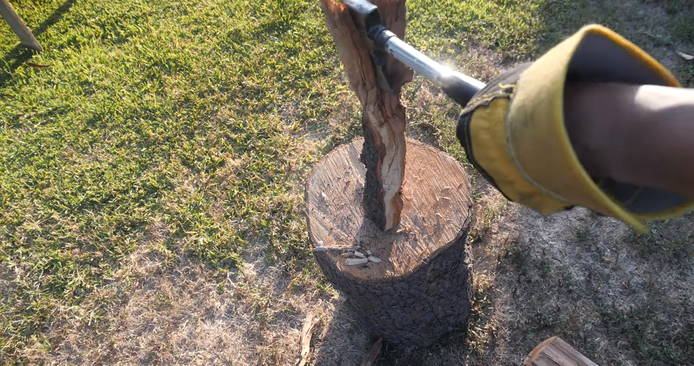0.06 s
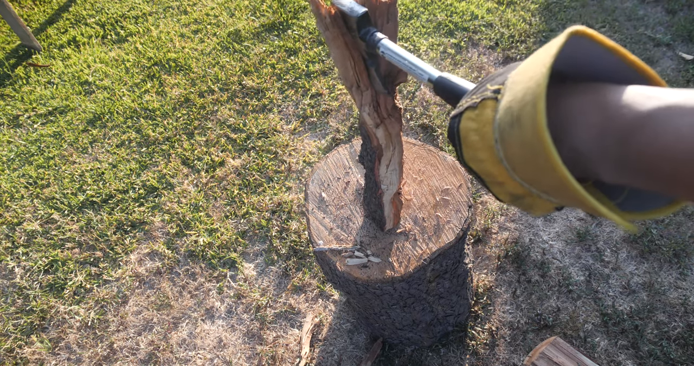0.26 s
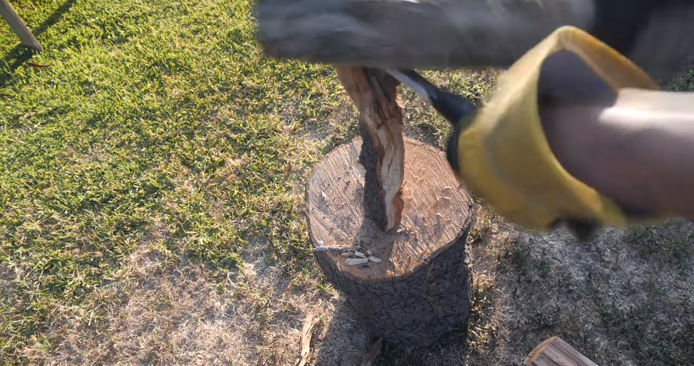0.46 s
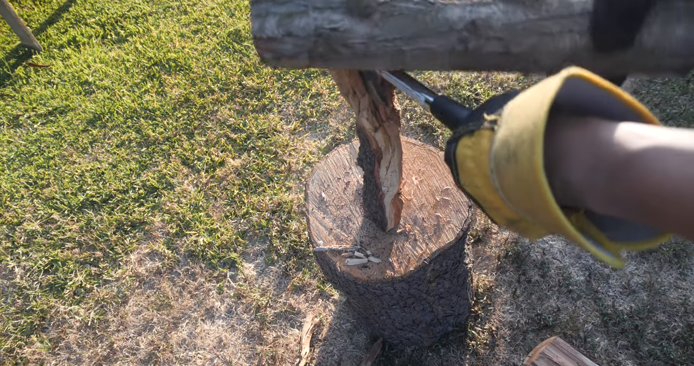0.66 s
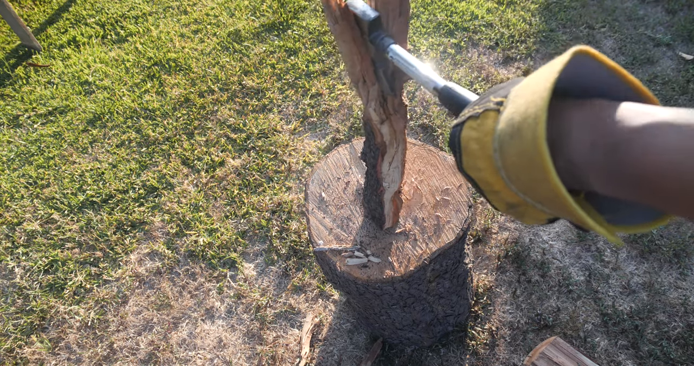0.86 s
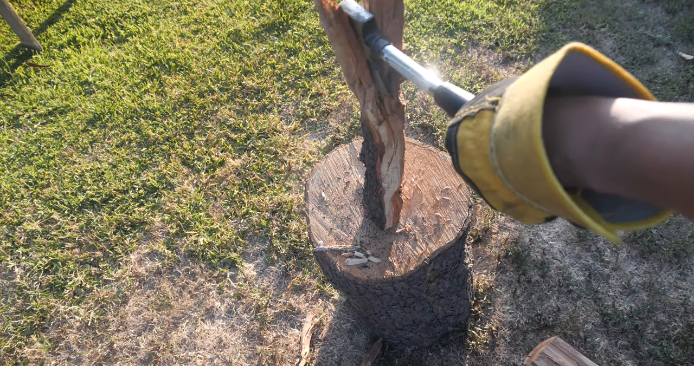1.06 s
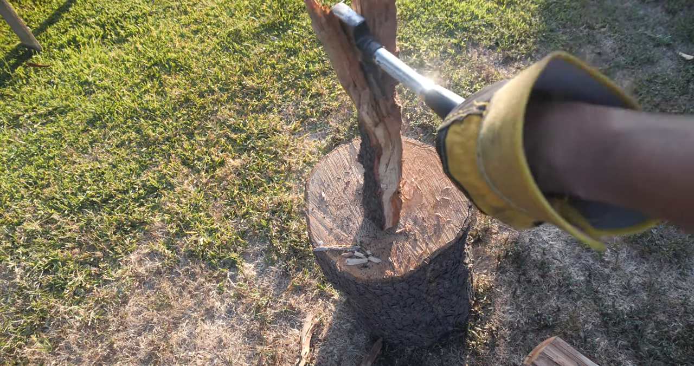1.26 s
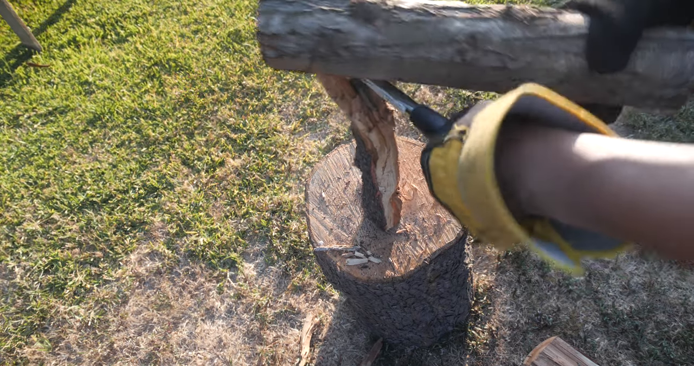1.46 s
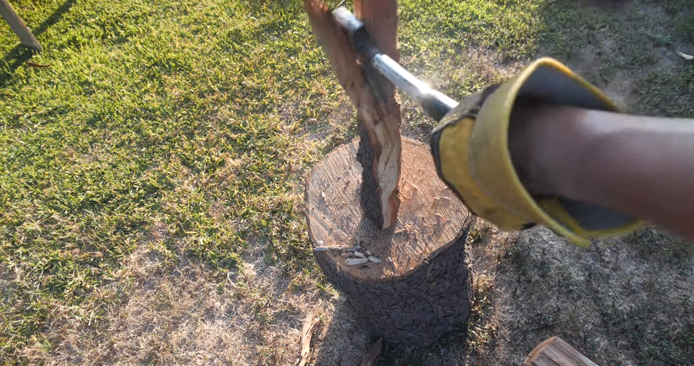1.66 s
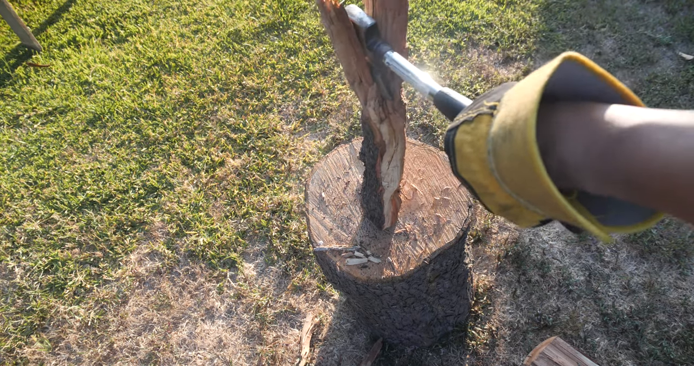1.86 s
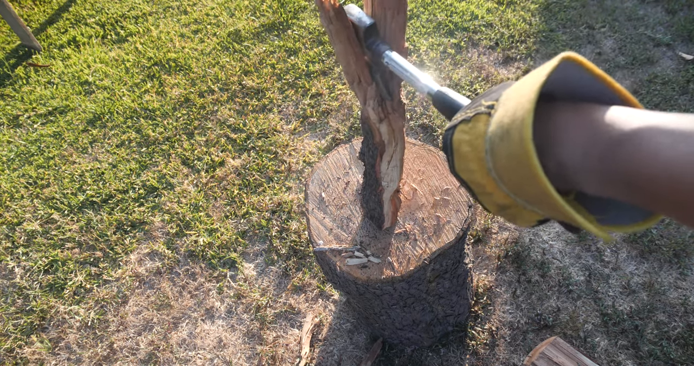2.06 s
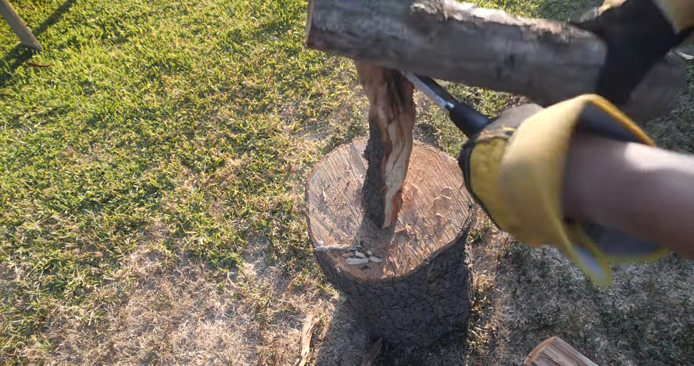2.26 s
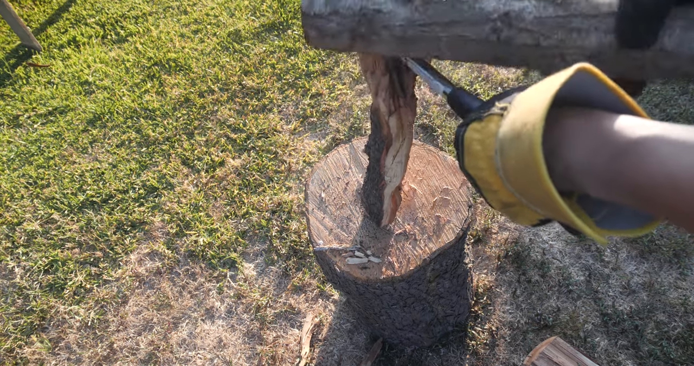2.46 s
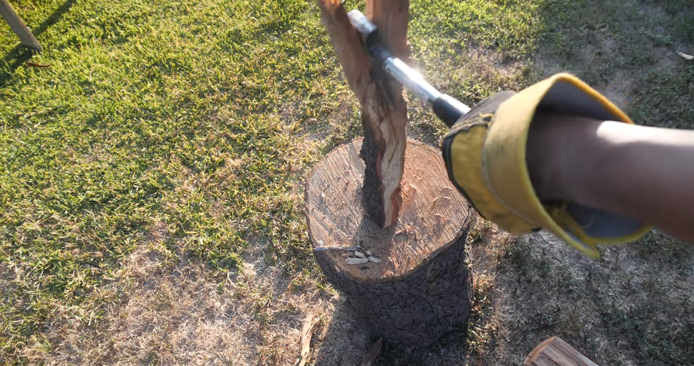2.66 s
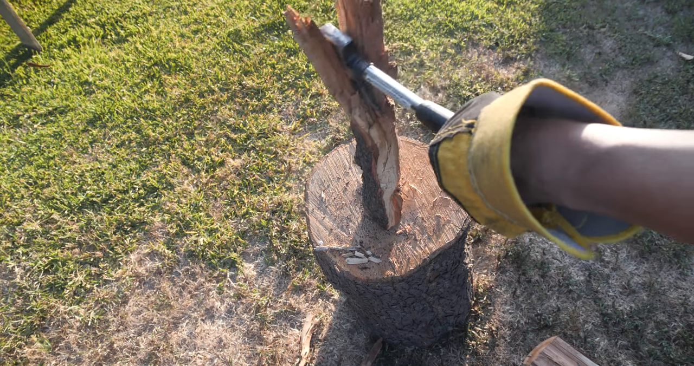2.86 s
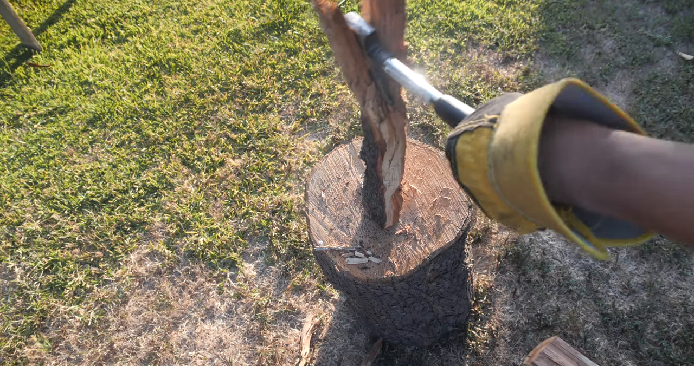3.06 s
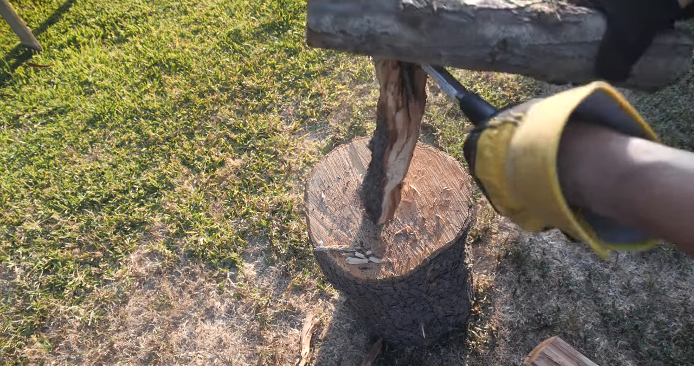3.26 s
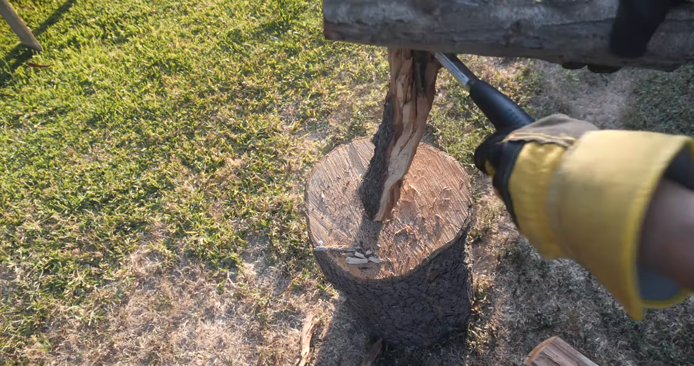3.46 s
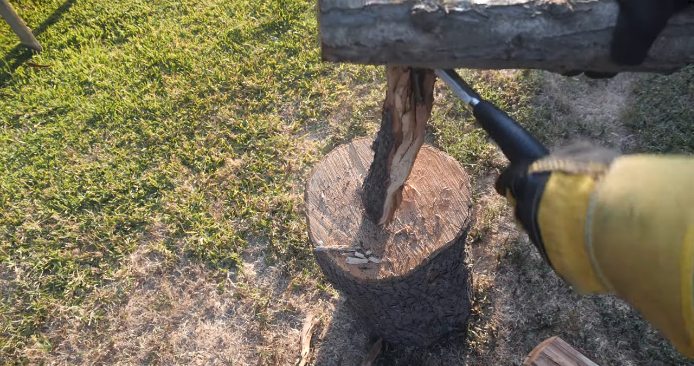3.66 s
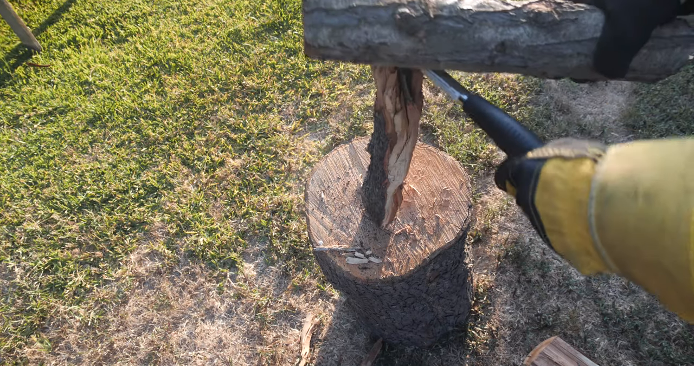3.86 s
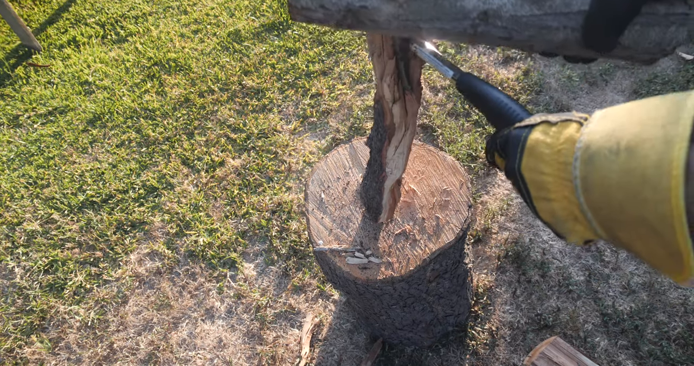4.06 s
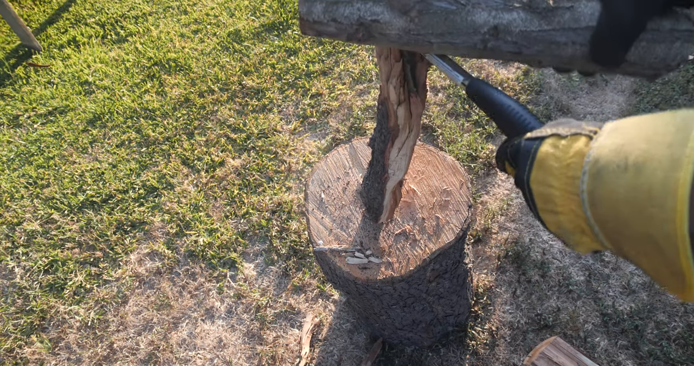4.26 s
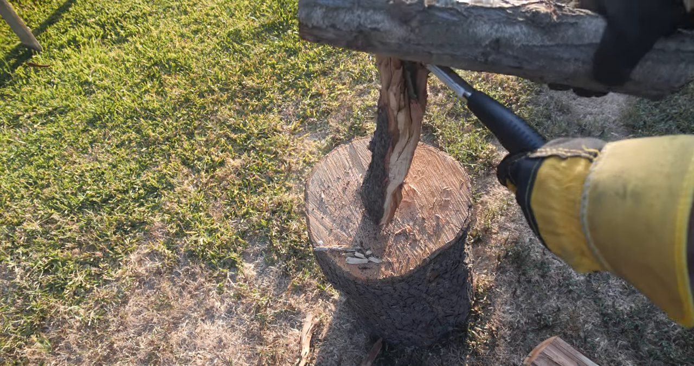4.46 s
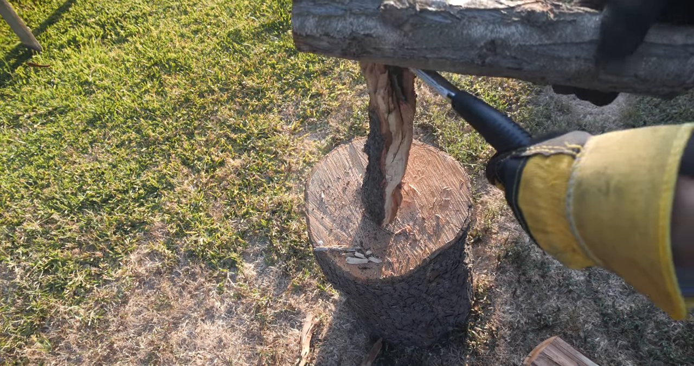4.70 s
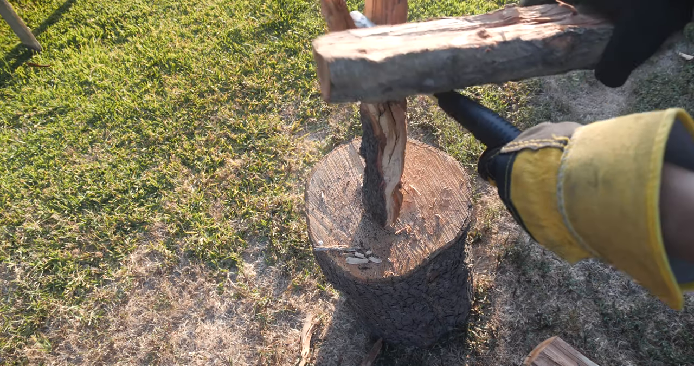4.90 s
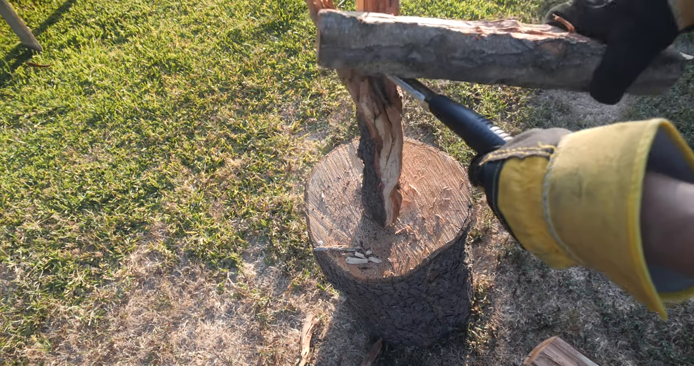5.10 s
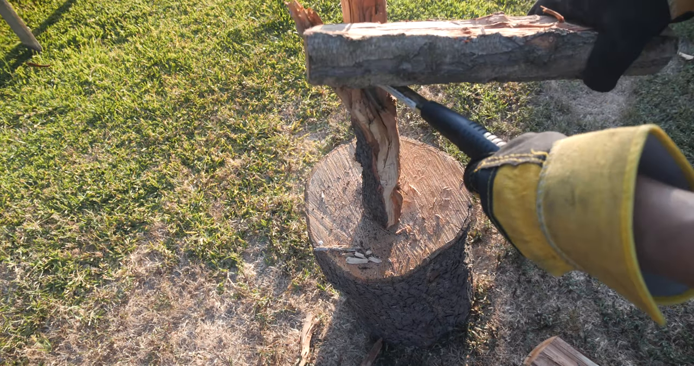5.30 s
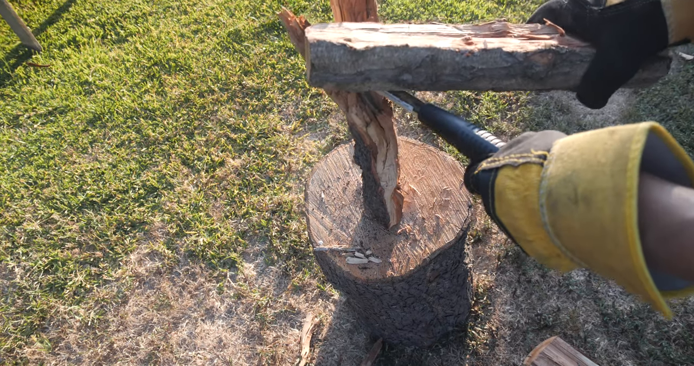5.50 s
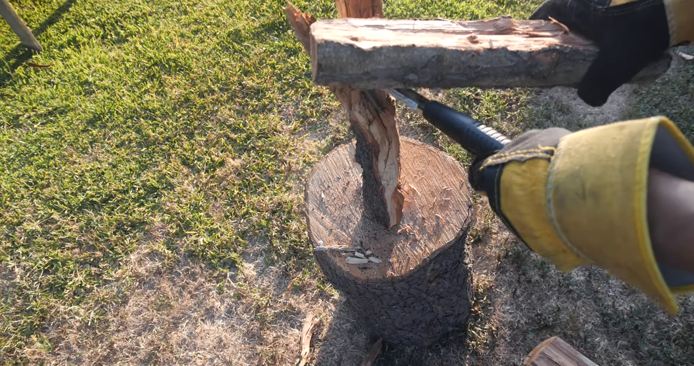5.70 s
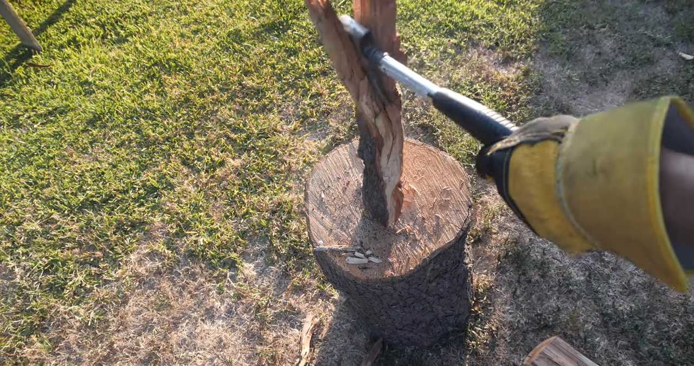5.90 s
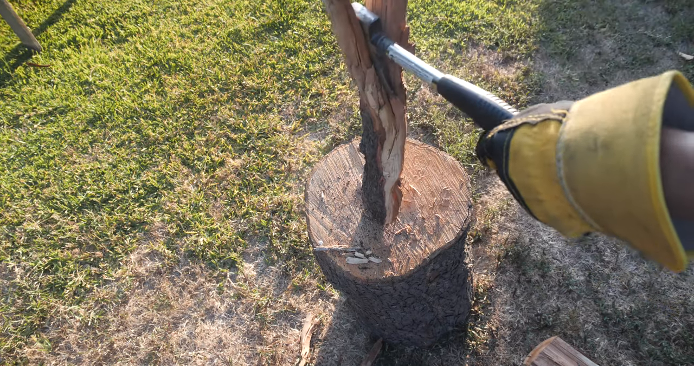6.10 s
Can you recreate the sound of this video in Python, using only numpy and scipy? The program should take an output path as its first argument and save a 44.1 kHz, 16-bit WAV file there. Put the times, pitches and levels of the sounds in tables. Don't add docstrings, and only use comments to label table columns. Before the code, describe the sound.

Four sharp, hollow wooden blows ring out and distort slightly at the microphone, slapping back off walls and fences. Soft air puffs precede the last three, and the stick thuds back onto its stump after each. Glove and bark rub between hits. Then quieter: the log rests on the hatchet, ticking, knocking and scraping over gentle wind rumble and faraway hum.

```python
import sys
import numpy as np
from scipy import signal
from scipy.io import wavfile

SR = 44100
rng = np.random.default_rng(int(sys.argv[2]) if len(sys.argv) > 2 else 0)


def decibels_to_gain(level_db):
    exponent = np.asarray(level_db, float) / 20
    return 10 ** exponent


def to_wav(sig):
    pcm = np.clip(np.atleast_2d(sig), -1, 1) * 32767
    pcm = np.round(pcm).astype(np.int16)
    wavfile.write(sys.argv[1], SR, pcm.T)


N = 270774

# frequency_hz, density_db [dB per Hz]
TEARING_SPECTRUM = [(600, 1), (1500, -0.5), (3500, 4.5), (6000, -9), (10000, -8.5), (16000, -16)]


def rms_one(x):
    return x / np.sqrt(np.mean(x ** 2) + 1e-20)


def add(out, start_s, sound):
    i = round(start_s * SR)
    out[i:i + len(sound)] += sound[:N - i]


def drift(rate_hz, size=N):
    pole = np.exp(-80 * np.pi * rate_hz / SR)
    white = rng.standard_normal(size // 40 + 2002)
    slow = signal.lfilter([1], [1, -2 * pole, pole * pole], white)[2000:]
    return np.interp(np.arange(size) / 40, np.arange(len(slow)), rms_one(slow))


def dying(t60_s, size):
    return decibels_to_gain(-60 * np.arange(size) / SR / t60_s)


def ring(hz, t60_s):
    t = np.arange(16000) / SR
    return np.sin(2 * np.pi * hz * t) * dying(t60_s, size=16000)


def band(x, low_hz, high_hz):
    edges_hz = [max(low_hz, 10), min(high_hz, .45 * SR)]
    return signal.sosfilt(signal.butter(2, edges_hz, "band", fs=SR, output="sos"), x)


def coloured(spectrum, patchy_db, size):
    hz, level_db = np.transpose(spectrum)
    edges = hz[0] * 2 ** np.arange(0, np.log2(hz[-1] / hz[0]) + .01, 1 / 3)
    white, out = rng.standard_normal((2, size + 4000)), 0
    for k, (low, high) in enumerate(zip(edges, edges[1:])):
        centre_db = np.interp(np.log(low * high) / 2, np.log(hz), level_db)
        gain = decibels_to_gain(centre_db + patchy_db * drift(20, size=size))
        out = out + gain * band(white[k % 2], low, high)[4000:]
    return rms_one(out)


def background():
    # time_s, level_db
    gusts = [(0.0, -39.5), (0.1, -48.5), (0.8, -49), (1.14, -46.5), (1.8, -58.5), (2.24, -56), (2.62, -61),
             (2.82, -59), (3.18, -66), (3.25, -52.5), (3.68, -65.5), (4.16, -64.5), (4.55, -70),
             (5.08, -67), (5.54, -74), (5.97, -59), (6.14, -50)]
    # frequency_hz, density_db [dB per Hz]
    wind_spectrum = [(18, 4), (35, -1.5), (55, 4), (80, -14.5), (120, -30.5)]
    # frequency_hz, density_db [dB per Hz]
    hum_spectrum = [(35, -22.5), (60, -1), (124, 3.5), (168, -12.5), (198, -3), (235, 1), (269, -10.5),
                    (479, -14.5), (514, -23.5), (700, -31.5), (910, -54.5), (1540, -120)]
    # frequency_hz, density_db [dB per Hz]
    air_spectrum = [(290, -24.5), (500, -7), (520, -13), (610, 0), (634, -9.5), (678, -5), (995, -7),
                    (1250, -8), (1900, -19), (3450, -13), (6860, -27.5), (11800, -26), (15300, -32.5),
                    (19000, -39.5)]
    gust_db = np.interp(np.arange(N) / SR, *np.transpose(gusts))
    wind = decibels_to_gain(gust_db + 4.2 * drift(6)) * coloured(wind_spectrum, 2.0, size=N)
    hum_db = -58.5 + 0.05 * (gust_db - gust_db.mean())
    hum = decibels_to_gain(hum_db) * coloured(hum_spectrum, 1.3, size=N)
    air = decibels_to_gain(-73.5) * coloured(air_spectrum, 0.6, size=N)
    return wind + hum + air


def rubbing():
    # peak_s, peak_db,
    # build_s, let_go_s
    shifts = [(.1, -81, 0.058, .6), (.4, -92, 0.079, 0.06), (0.727, -64, 0.0046, 0.026),
              (1.374, -75.5, 0.1, 0.0028), (1.55, -77, .06, 0.11), (1.69, -76.5, .12, 0.042),
              (1.944, -84, .1, 0.018), (2.282, -73, 0.1, 0.0037), (3.145, -72, 0.022, 0.15),
              (3.48, -76.5, .05, 0.0805), (3.36, -77, .08, 0.29), (3.69, -75.5, .012, 0.12),
              (3.75, -79, 0.05, 0.045), (3.832, -74.5, 0.06, 0.0082), (3.99, -84, 0.014, 0.023),
              (4.275, -67.5, 0.011, 0.029), (4.26, -85.5, .3, .02), (4.656, -79, .2, 0.032),
              (4.79, -76, 0.18, 0.033), (4.975, -74.5, 0.041, 0.038), (4.992, -85, 0.45, 0.7),
              (5.158, -66, .02, 0.026), (5.24, -81.5, .06, .2), (5.436, -81, 0.018, 0.049),
              (5.84, -67, 0.014, 0.023)]
    swing_db, hollow_db, grains_per_s = 20, 8, 2700
    t = np.arange(N) / SR
    sizes = decibels_to_gain(2.9 * np.minimum(rng.exponential(1, N), 5)) * rng.choice([-1, 1], N)
    clumps = decibels_to_gain(3 * drift(40))
    grains = sizes * (rng.random(N) < grains_per_s * clumps / SR)
    pressure = np.zeros(N)
    for peak_s, peak_db, build_s, let_go_s in shifts:
        away = np.maximum((peak_s - t) / build_s, (t - peak_s) / let_go_s)
        pressure += decibels_to_gain(peak_db - swing_db * away)
    bright = rms_one(band(grains, 2420, 16000))
    rustle = coloured([(2500, 6), (3600, 16.5), (7000, -24.5), (16000, -16)], 1.3, size=N) * clumps
    scrape_grains = rms_one(band(grains, 680, 1800))
    scrape_noise = rms_one(band(rng.standard_normal(N), 730, 2200))
    scrape = 0.57 * scrape_grains + 0.6 * scrape_noise
    return pressure * (0.89 * bright + 1.2 * rustle + decibels_to_gain(hollow_db) * scrape)


def puffs():
    # peak_s, peak_db, pitch_hz
    swings = [
        (1.355, -39.5, 26.8),
        (2.26, -32, 26),
        (3.157, -29, 24),
    ]
    out, t = np.zeros(N), np.arange(-4000, 4000) / SR
    for peak_s, peak_db, hz in swings:
        wave = np.cos(2 * np.pi * hz * t) * np.exp(-(2.4 * hz * t) ** 2)
        add(out, peak_s - 4000 / SR, decibels_to_gain(peak_db) * wave)
    return out


def thuds():
    # peak_s, peak_db, push_s
    landings = [
        (0.604, -34, 0.0024),
        (1.4597, -25.5, 0.0016),
        (1.478, -34.5, 0.0027),
        (2.356, -30, 0.0021),
        (3.245, -25, 0.0023),
        (4.213, -39, .0025),
        (4.275, -40.5, 0.0018),
        (4.28, -41.5, 0.0049),
    ]
    out = np.zeros(N)
    for peak_s, peak_db, push_s in landings:
        u = np.arange(-300, 2500) / SR / push_s
        push = np.exp(-(3 * u) ** 2)
        swing_back = (u > .2) * np.tanh(4 * (u - .2)) * np.exp(-np.abs(u - .2) / 1.1)
        add(out, peak_s - 300 / SR, decibels_to_gain(peak_db) * (push - .75 * swing_back))
    return out


def ring_log(lower_db, upper_db):
    # frequency_hz, t60_s, after_ring_db, after_ring_t60_s
    modes = [(970.6, 0.084, -38.5, 0.37), (1255.5, .12, -40.5, 0.44)]
    grip_s = 0.033
    grip = np.exp(-(np.arange(16000) / SR / grip_s) ** 2)
    out = np.zeros(16000)
    for level_db, (hz, t60_s, late_db, late_t60_s) in zip((lower_db, upper_db), modes):
        wobble = .45 + drift(28, size=16000)
        after_ring = decibels_to_gain(late_db) * wobble * ring(hz, late_t60_s)
        out += decibels_to_gain(level_db) * (grip * ring(hz, t60_s) + after_ring)
    return out


def snaps():
    # start_s, peak_db, centre_hz, width_octaves
    splinters = [(0.1262, -55.5, 3210, 1.1), (0.429, -45.5, 2300, 1.9), (0.7236, -30.5, 3240, 0.83),
                 (0.7285, -33.5, 4180, 2.9), (0.744, -50, 3500, 2.1), (1.6894, -63.5, 3510, 2.95),
                 (1.9246, -56, 3510, 2.05), (2.7685, -58.5, 3370, 2.1), (2.829, -65, 4240, 2.8),
                 (3.1202, -41.5, 3597, 2.5), (3.3957, -52, 3300, 2.6), (3.692, -52, 4200, 2.3),
                 (3.8273, -54, 3068, 3), (4.2124, -55, 2744, 1.8), (4.271, -54, 3290, 2.3),
                 (4.2772, -48, 2650, 0.66), (4.6054, -62, 3850, 2.7), (4.6293, -60, 3870, 2.66),
                 (4.754, -54.5, 3557, 3.4), (4.7863, -53, 3290, 1.3), (4.9594, -60.5, 3854, 3.3),
                 (4.9743, -51.5, 2540, 2.2), (5.021, -46, 2300, 2.6), (5.119, -55, 4000, 2.3),
                 (5.1473, -48, 2770, 1.2), (5.164, -63, 2730, 2.2), (5.1926, -62, 2770, 2.05),
                 (5.438, -50.5, 2510, 1.42), (5.8329, -42, 3126, 1.14), (5.8434, -51, 4050, 2.4)]
    # start_s, peak_db, centre_hz, width_octaves
    ticks = [(0.6784, -56, 7640, 0.81), (0.7034, -58, 8100, 0.79), (0.7237, -32.5, 9500, 1.04),
             (1.4665, -46, 7320, 0.98), (1.569, -56, 7100, 1.3), (1.9405, -52, 8500, 0.81),
             (3.1194, -64, 6680, 1), (3.2675, -31.5, 7650, 0.39), (3.8267, -51, 10860, 1.4),
             (3.9898, -58.5, 11450, 1.03), (4.1729, -65, 7400, 1.14), (4.2544, -62.5, 7270, 1.13),
             (5.109, -59.5, 13000, 1.24), (5.146, -55, 9270, 1.1), (5.3694, -57, 6000, 2.4),
             (5.83, -48, 6730, 1.95), (5.844, -58, 9200, 0.92)]
    # start_s, peak_db, pitch_hz, t60_s
    knocks = [(0.726, -36.5, 1400, 0.029), (1.8906, -53, 1465, 0.022), (2.3867, -31.5, 2350, 0.032),
              (3.278, -39.5, 2340, 0.27), (3.692, -46.5, 3610, 0.04), (4.2727, -45, 1640, 0.022),
              (4.9836, -52, 2330, 0.025), (5.1459, -44, 1680, 0.031), (5.1926, -50, 1620, 0.034),
              (5.4382, -54, 1490, 0.024), (5.831, -42, 1694, 0.036)]
    # start_s, peak_db
    touches = [
        (0.725, -74),
        (4.27, -53),
        (5.02, -58),
        (5.147, -50.5),
        (5.829, -49),
    ]
    out = np.zeros(N)
    for rows, t60_s in ((splinters, .016), (ticks, .018)):
        for start_s, peak_db, hz, octaves in rows:
            struck = rng.standard_normal(4000)
            struck[0] = 5.0
            half_width = 2 ** (octaves / 2)
            burst = band(struck * dying(t60_s, size=4000), hz / half_width, hz * half_width)
            add(out, start_s, decibels_to_gain(peak_db - 1.5) * burst / np.max(np.abs(burst)))
    for start_s, peak_db, hz, t60_s in knocks:
        add(out, start_s, decibels_to_gain(peak_db - 7.5) * ring(hz, t60_s))
    for start_s, peak_db in touches:
        add(out, start_s, ring_log(peak_db - 7.5, peak_db - 4.0))
    return out


def blows():
    # start_s, lower_log_mode_db, upper_log_mode_db, stick_and_stump_db, tearing_db
    strikes = [
        (.5310, -2, -0.5, -5.5, -10),
        (1.3772, -1.5, -1.5, -5, -8),
        (2.2850, -8.5, 2, -4.5, -8.5),
        (3.1811, 6, 3.5, -4, -4.5),
    ]
    # frequency_hz, level_db, t60_s
    body_modes = [(164.4, -8, .05), (284, -9.5, 0.062), (779.5, 2.5, 0.033), (1377, -9.5, 0.049),
                  (1950, -18, 0.017), (2304, -8, .035), (2805, -4.5, 0.034), (4864, -20, 0.023),
                  (6720, -16, 0.05)]
    # frequency_hz, density_db [dB per Hz]
    thump_spectrum = [(100, -7.5), (200, -3), (450, -2.5), (750, -8), (1100, 3.5), (1600, -17.5)]
    tear_s, contact_db = 0.0043, 18
    rings, noise, contact = np.zeros(N), np.zeros(N), np.zeros(N)
    t = np.arange(4000) / SR
    running = decibels_to_gain(-2500 * np.maximum(t - tear_s, 0))
    settling = decibels_to_gain(-22.5) * dying(0.059, size=4000)
    for start_s, lower_db, upper_db, body_db, tear_db in strikes:
        add(rings, start_s, ring_log(lower_db, upper_db))
        for hz, level_db, t60_s in body_modes:
            mode_db = body_db + level_db + 1.2 * rng.standard_normal()
            add(rings, start_s, decibels_to_gain(mode_db) * ring(hz, t60_s))
        tearing = (running + settling) * coloured(TEARING_SPECTRUM, 0, size=4000)
        add(noise, start_s, decibels_to_gain(tear_db) * tearing)
        thump = dying(0.037, size=4000) * coloured(thump_spectrum, 0, size=4000)
        add(noise, start_s, decibels_to_gain(body_db + 7.0) * thump)
        add(contact, start_s, decibels_to_gain(body_db + contact_db) * np.hanning(5))
    return rings, noise, contact


def yard(x):
    # delay_s, over_tail_db, smear_s
    walls = [(0.021, 3.5, 0.0046), (.052, 8.5, 0.0065), (.072, 0.5, .006), (.104, 8, .004),
             (0.121, 7.5, .006), (0.169, 7, .008), (0.292, 4, .02)]
    # frequency_hz, level_db, t60_s
    tail_bands = [(244, -5, 0.15), (506, -4, 0.11), (940, -1.5, 0.26), (2000, 1, .3), (4000, 3.5, 0.21),
                  (8000, -6, 0.12), (14000, -5.5, 0.057)]
    t = np.arange(26000) / SR
    size = len(t)
    lumps = np.ones(size)
    for delay_s, over_db, smear_s in walls:
        lumps += decibels_to_gain(over_db) * (t >= delay_s) * np.exp(-np.abs(t - delay_s) / smear_s)
    tail = np.zeros(size)
    for hz, level_db, t60_s in tail_bands:
        octave = rms_one(band(rng.standard_normal(size), hz / np.sqrt(2), hz * np.sqrt(2)))
        tail += decibels_to_gain(level_db) * octave * np.sqrt(hz) * dying(np.clip(t60_s, .15, .5), size=size)
    late = dying(0.72, size=size) * coloured(TEARING_SPECTRUM, 0, size=size)
    tail = tail + decibels_to_gain(-24) * np.std(tail[:2000]) * late
    response = tail * lumps * np.minimum(t / 0.0071, 1)
    response = decibels_to_gain(-21.5) * response / np.sqrt(np.sum(response ** 2))
    return signal.fftconvolve(x, response)[:N]


def scene():
    rings, noise, contact = blows()
    small = snaps() + thuds()
    scattered_ring = decibels_to_gain(-14) * band(rings, 700, 1700)
    echoes = yard(contact + decibels_to_gain(-9.5) * noise + small + scattered_ring)
    return (rings + noise + small + echoes + puffs() + rubbing() + background())[None]


def roll_off(x):
    return signal.sosfilt(signal.butter(12, 16840, fs=SR, output="sos"), x)


def record(dry):
    overload = .315
    clipped = np.clip(dry, -overload, overload)
    rounded = signal.lfilter(*signal.butter(1, 16000, fs=SR), clipped)
    top_cut = signal.cheby2(12, 70, 17000, fs=SR, output="sos")
    return roll_off(signal.sosfilt(top_cut, rounded))


dry = scene()
out = record(dry)
to_wav(out)
```